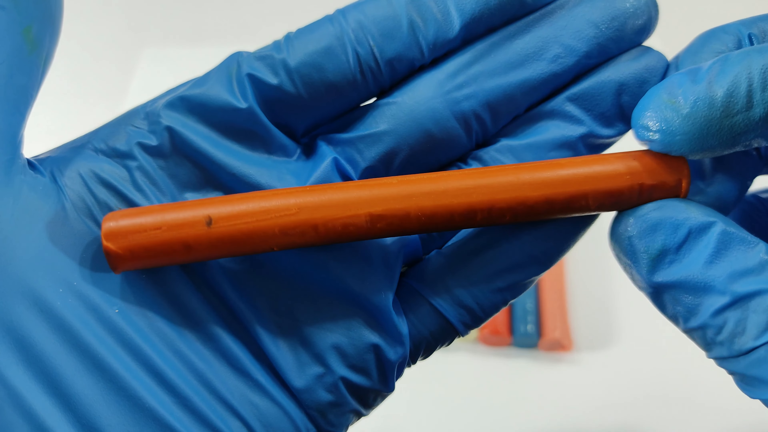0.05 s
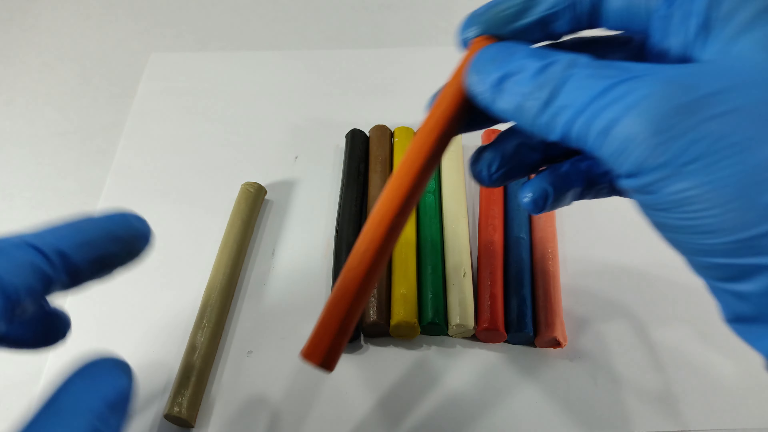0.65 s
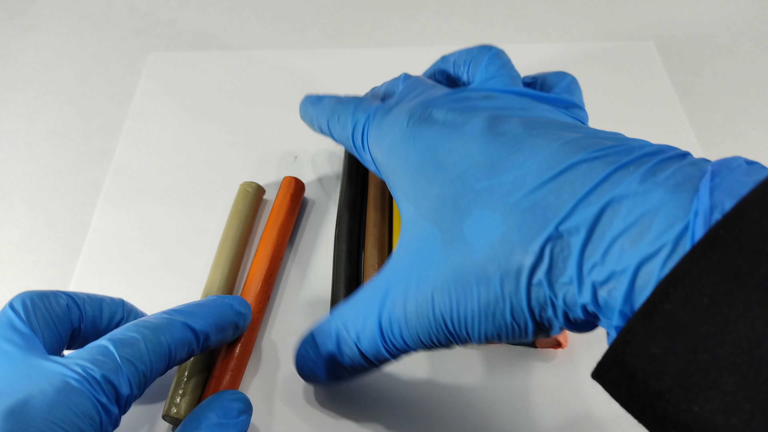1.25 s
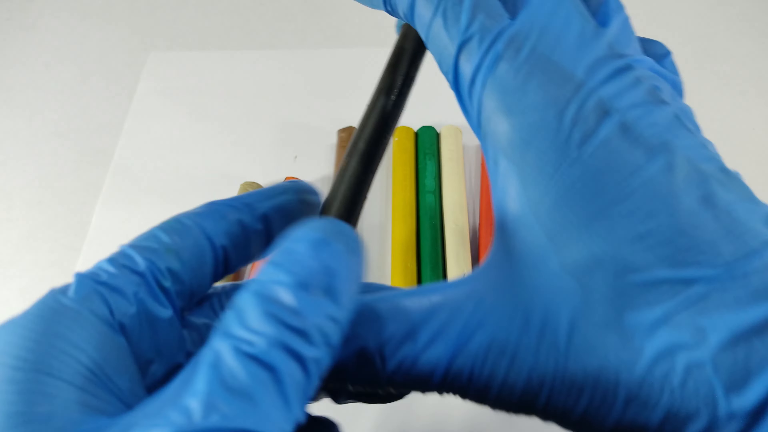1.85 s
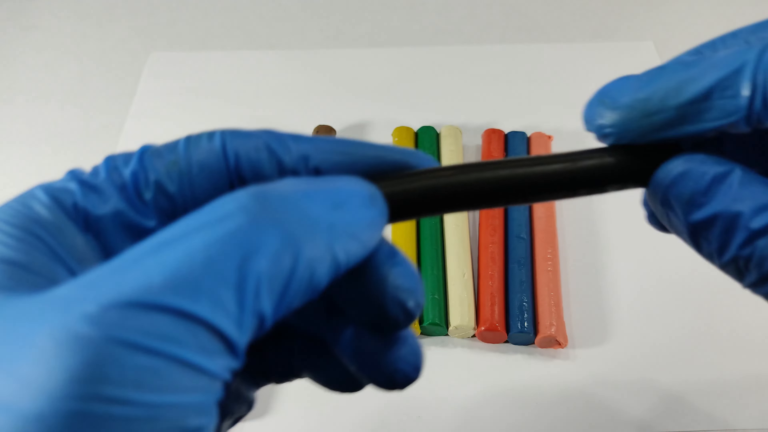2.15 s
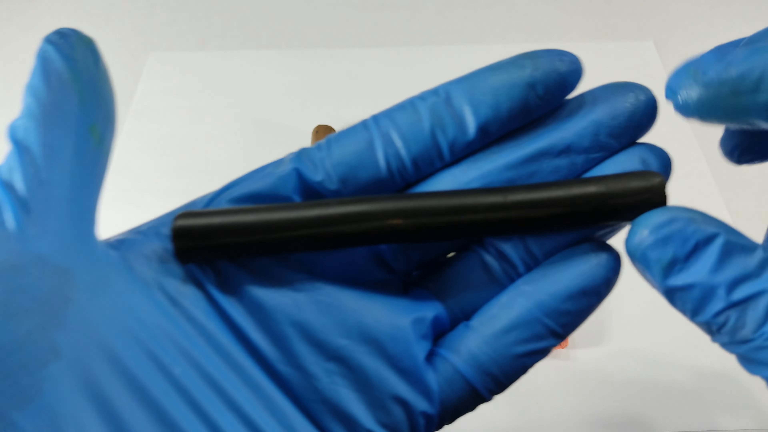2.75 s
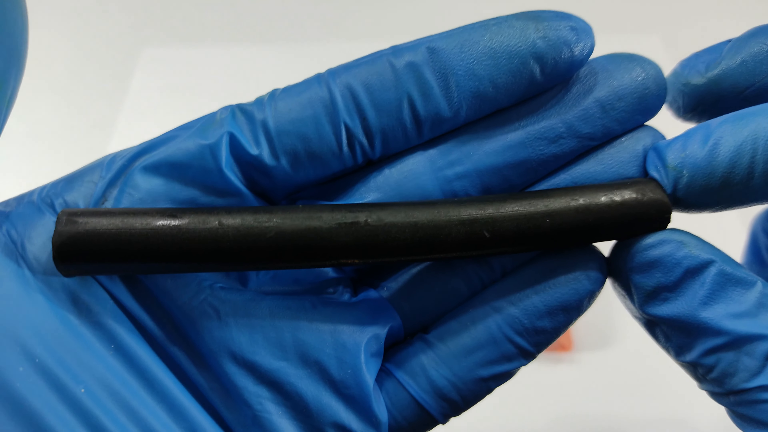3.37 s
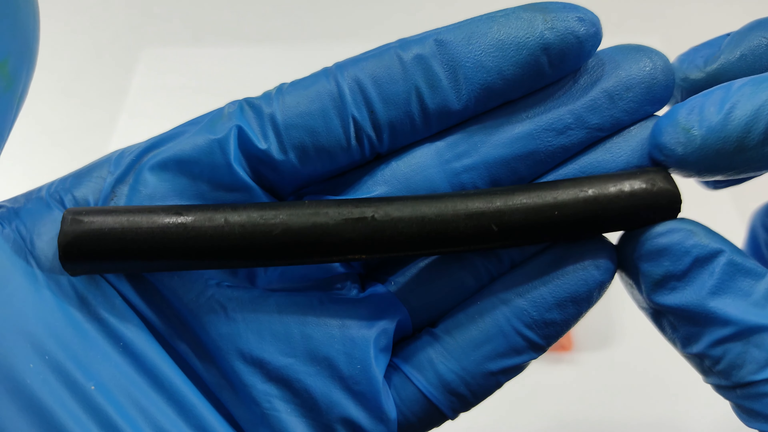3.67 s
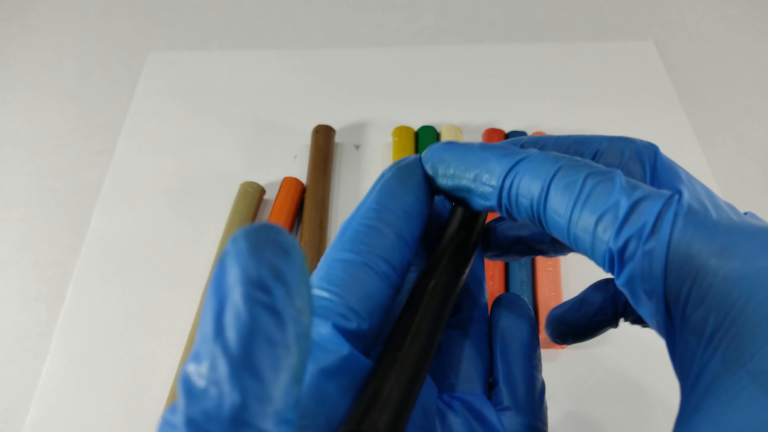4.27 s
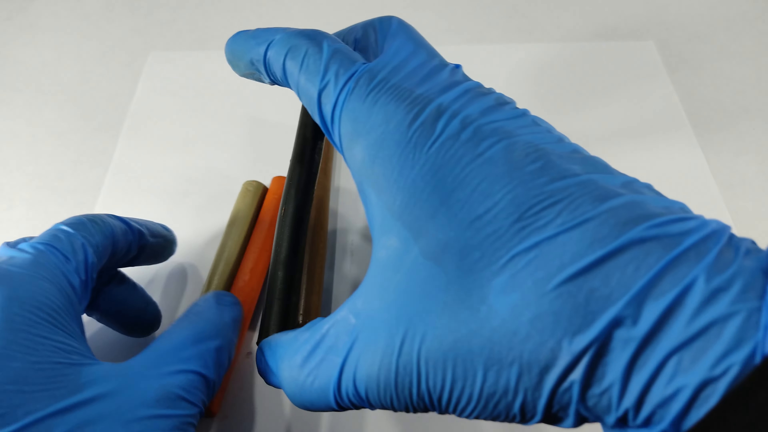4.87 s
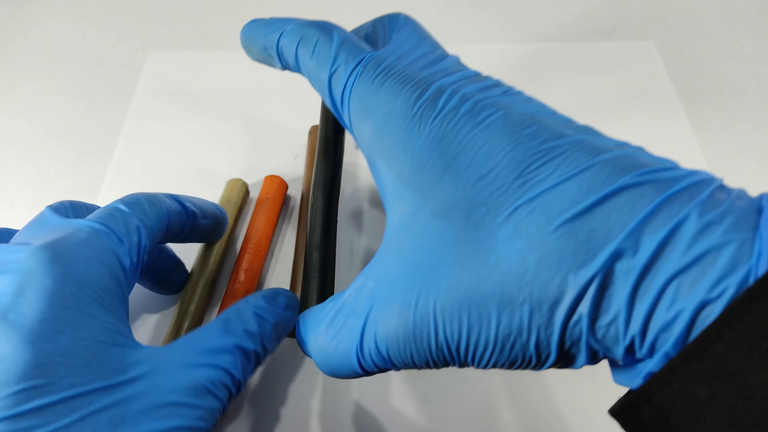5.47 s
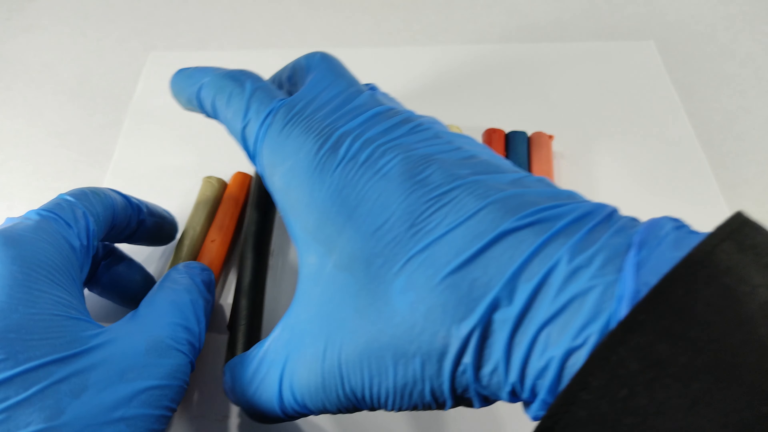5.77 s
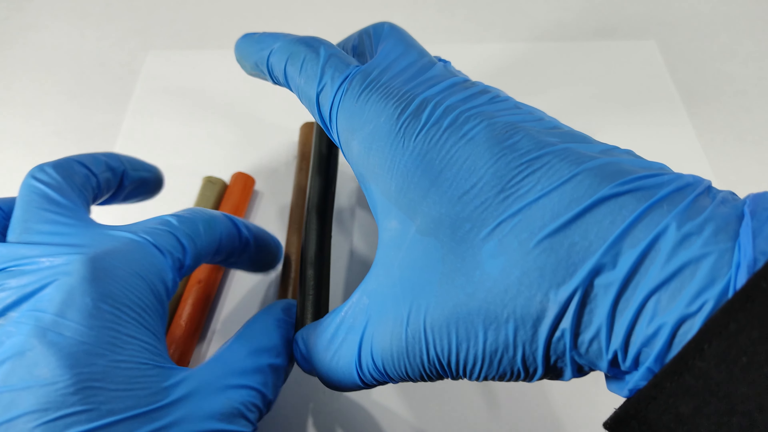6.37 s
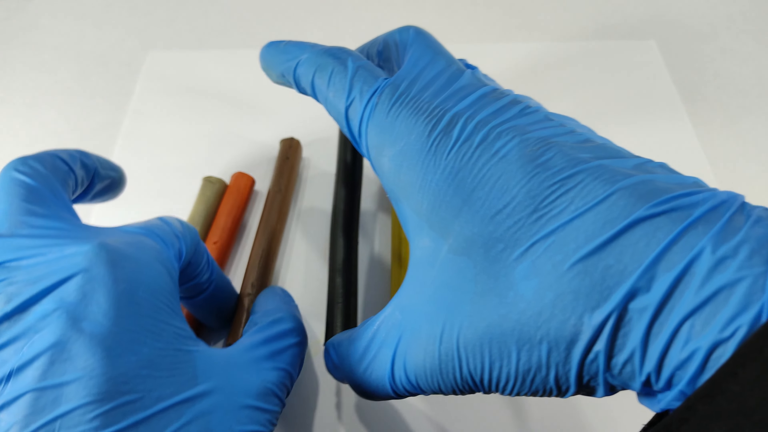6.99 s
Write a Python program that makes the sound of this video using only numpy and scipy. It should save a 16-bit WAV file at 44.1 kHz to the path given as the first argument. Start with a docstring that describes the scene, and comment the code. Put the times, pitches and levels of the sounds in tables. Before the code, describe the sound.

Sticks of modelling clay set down on a paper-covered table with dull knocks, amid faint snaps and rubs of thin rubber gloves.

```python
"""Modelling clay on a table

Gloved hands pick up sticks of modelling clay and set them down on a paper-covered table, close by.
Two sticks drop with dull knocks that slap the paper and ring the table; others are nudged softly.
The thin rubber gloves rub (tiny slips), snap (folds flip) and squeak (stick-slip).
A small quiet room answers each sound."""
import sys
import numpy as np
from scipy import signal
from scipy.fft import rfft, irfft, next_fast_len
from scipy.io import wavfile
from scipy.ndimage import map_coordinates

SR = 44100
rng = np.random.default_rng(int(sys.argv[2]) if len(sys.argv) > 2 else 0)


def unload_wav(signal):
    """Save mono or channel-first audio to the path in sys.argv[1] as 16-bit WAV at rate SR, clipped to [-1, 1]."""
    wavfile.write(
        sys.argv[1],
        SR,
        np.round(np.clip(np.atleast_2d(signal).T, -1, 1) * 32767).astype(np.int16),
    )


N = 310023

# room hum: pitch_hz, level_db
HUM_TONES = [(425.3, -86), (559.9, -85), (904.4, -81)]
# clay drags or rolls on paper: peak_s, level_db, half_length_s, rumble_db
DRAGS = [(1.025, -61.5, .012, -81), (1.222, -51.5, .01, -72), (1.335, -42.5, .028, -46),
         (1.53, -64, .05, -76), (1.872, -39, .006, -56), (2.10, -83.5, .037, -62),
         (5.012, -64.5, .017, -56.5), (5.057, -45.5, .009, -48), (5.118, -49, .008, -56),
         (5.668, -71, .016, -50), (6.087, -57, .016, -49)]
# glove slides on glove or clay: peak_s, level_db (before RUB_TRIM_DB), half_length_s, fold_hz, width_oct
RUBS = [(.387, -56, .034, 6700, 2.5), (.464, -55, 0.019, 6300, 2.5), (.882, -68.5, .025, 4170, 3),
        (1.161, -49.5, .018, 3970, 3.2), (1.345, -56.5, 0.013, 5900, 2), (1.527, -60.5, .04, 1450, 0.92),
        (1.856, -56, .012, 8350, 2.5), (2.02, -55, .022, 8500, 3.1), (2.378, -56.5, .026, 11000, 2.21),
        (2.496, -62, .035, 6555, 2.8), (2.596, -54.5, .022, 4900, 1.1), (2.754, -59, .018, 4730, 0.47),
        (3.99, -57.5, 0.022, 6360, 1.403), (4.285, -63, .012, 6400, 3.4), (4.417, -63, 0.035, 6480, 1.4),
        (4.553, -65, 0.025, 6330, 1.25), (4.709, -60.5, 0.036, 6800, 1.6), (6.715, -67.5, .018, 6020, 1.2),
        (6.956, -72, 0.05, 5040, 1.02)]
# fingers shift their hold: start_s, end_s
REGRIPS = [(.52, .72), (2.1, 2.32), (4.08, 4.6)]
# rubber sticks and slips on clay: peak_s, level_db, half_length_s, pitch_hz
SQUEAKS = [(0.395, -65, 0.045, 3730), (.485, -53, 0.0039, 2450), (.486, -60, 0.0098, 1940),
           (1.47, -59, .019, 2400), (2.39, -68.5, 0.045, 2958), (2.387, -72, 0.031, 1900),
           (2.732, -53.5, 0.0035, 3010), (5.005, -51, 0.0031, 2060), (5.044, -55, 0.0034, 2110),
           (2.589, -66, .013, 2990), (6.837, -68, 0.012, 3550), (6.838, -65, 0.011, 4900),
           (6.96, -72, 0.043, 4050)]
# a glove fold flips: peak_s, level_db, fold_hz, width_oct
SNAPS = [(1.122, -38.5, 6300, 6.6), (1.21, -43, 6400, 2.7), (1.5012, -37.5, 7220, 1.83),
         (1.544, -47.5, 6216, 1.3), (2.040, -45, 13040, 0.97), (2.4755, -45, 5000, 1.03),
         (2.583, -42.5, 4734, 1.7), (2.6283, -53.5, 4510, 1.31), (2.735, -38.5, 5056, 2.2),
         (3.978, -53, 5896, 1.65), (4.005, -44.5, 8540, 1.65), (4.093, -54, 3280, 1.3),
         (4.702, -56, 6280, 0.82), (5.004, -42.5, 8990, 1.37), (5.065, -46, 7130, 1.3),
         (5.118, -43.5, 8400, 0.8), (5.279, -44.5, 6400, 1.4), (5.343, -53, 5320, 1.23),
         (5.659, -58.5, 4060, 1.5), (6.838, -56.5, 5000, 1.7)]
# table modes: pitch_hz, weight_db, t60_s (before capping and shortening for soft knocks)
TABLE_MODES = [(119, 1, 0.39), (176.2, 1, 0.25), (211, 1.5, 0.23), (256, -5.5, 0.71), (355.6, 0, 0.78),
               (424, -8.5, 0.4), (487.2, -2, 0.3), (615.5, -9, 0.29), (713.5, -9, 0.25), (791, -8.5, 0.12),
               (1152, -14.5, 0.72), (1244, -6.5, 0.51), (1503, -16, 0.19), (1600, -18, 0.22),
               (1710, -12, 0.23), (1970, -12.5, 0.63), (2191, -21.5, 0.84), (2180, -18, 0.22),
               (2260, -19.5, 0.14), (2543, -28.5, 0.3), (2700, -22.5, 0.18), (2716, -21.5, 0.18)]
# clay meets table: start_s, force_db, grip (0-1), slap_db (re force, before SLAP_TRIM_DB), spot_hz
# slap_db is high when the stick lands flat
KNOCKS = [(1.0409, -33.5, .3, -12, 337), (1.243, -20.5, 0.012, -3.5, 131), (1.249, -17.5, 0.06, -18, 603),
          (1.271, -27, .22, -15.5, 284), (1.880, -21, .05, 4.5, 399), (1.887, -20.5, .22, -15, 318),
          (5.068, -36.5, .8, -3.5, 338), (5.075, -36, 1, -32, 342), (5.675, -43, .9, -41, 330),
          (6.081, -51, .45, -1, 149.3)]
# noise spectra: freq_hz, density_db
AIR_SPECTRUM = [(12, -25.5), (20, 2.5), (38, -15.5), (98, -20.5), (185, -26.5), (225, -20), (259, -26),
                (416, -22.5), (581, -25.5), (667, -26.5), (906, -30.5), (1040, -31), (2030, -34),
                (5530, -43.5), (15500, -45.5)]
DRAG_SPECTRUM = [(40, -24), (130, -5), (380, 3.5), (650, -12.5), (1400, -11.5), (2500, -27), (6000, -45)]
RUMBLE_SPECTRUM = [(30, -13.5), (55, -5), (85, -8.5), (120, 1), (190, -0.5), (280, -19), (800, -54)]
GLOVE_SPECTRUM = [(300, -35.5), (1400, -8), (2400, -5), (3100, -3), (4200, -5), (5100, -3.5), (5800, -2.5),
                  (6700, -0.5), (7700, -4), (9500, -6), (11500, -6.5), (14000, -7), (16000, -15)]
THUD_SPECTRUM = [(30, -20), (60, -13), (90, -14), (125, -6.5), (180, -1.5), (260, -3.5), (380, 1),
                 (500, -1), (700, -21), (1200, -35.5), (3000, -71.5)]
CLAP_SPECTRUM = [(150, -32), (450, -8), (620, -2.5), (1000, -3.5), (1200, -9.5), (2000, -23), (5000, -48)]
SLAP_SPECTRUM = [(400, -37), (900, -17), (1250, -2.5), (1430, -2), (1580, -2), (1850, -8), (2300, -8.5),
                 (2520, -15.5), (2780, -10), (3300, -20.5), (8000, -47), (16000, -60)]
CRACK_SPECTRUM = [(800, -19.5), (2500, 1.5), (4200, -2), (7000, -6.5), (10000, -14.5), (15500, -16)]

AIR_DB, TOP_HZ = -66.5, 15850
RUBBER_BRIGHT_HZ, RUBBER_PULL = 8300, .17
RUB_TRIM_DB, SLAP_TRIM_DB = -2, 3.5
SETTLE_DB, SETTLE_LAG_S, SETTLE_HALF_S = -15.5, .006, .014  # level re the snap
RUSTLE_DB, RUSTLE_HALF_S, RUSTLE_HZ, RUSTLE_WIDTH_OCT = -79, .042, 6400, 2
RING_DB, THUD_DB, CLAP_DB = -1, .5, 2  # re force, free stick
GRIP_MUTE_DB, SOFT_KNOCK_SHORTENING, MAX_RING_T60_S = 33, .15, .32
FIRM_FORCE_DB, FIRM_CUTOFF_HZ, FORCE_DB_PER_OCT = -21.5, 3300, 18
CRACK_DB, CRACK_DB_PER_DB = -4.9, .8  # re slap_db at firm force; growth with force


def amp(db):
    """Decibels to gain."""
    return 10 ** (np.asarray(db) / 20)


def spectrum(points):
    """Gain curve through (freq_hz, density_db) points on a log axis."""
    freq_hz, density_db = np.transpose(points)
    return lambda hz: amp(np.interp(np.log(hz + 1), np.log(freq_hz), density_db))


def resonance(hz, centre_hz, q):
    """Gain of one resonance."""
    return 1 / np.hypot(1, q * ((hz + 1) / centre_hz - centre_hz / (hz + 1)))


def noise(colour, size):
    """Unit-rms noise shaped by the gain curve colour(hz)."""
    hz = np.fft.rfftfreq(size, 1 / SR)
    x = irfft(colour(hz) * np.exp(2j * np.pi * rng.random(len(hz))), size)
    return x / np.sqrt(np.mean(x ** 2) + 1e-20)


def wobble(rate_hz, size):
    """Smooth random curve."""
    knots = rng.standard_normal(int(size * rate_hz / SR) + 4)
    return map_coordinates(knots, [np.arange(size) * rate_hz / SR])


def burst(colour, envelope):
    """Coloured noise with the energy of its envelope."""
    x = noise(colour, len(envelope)) * envelope
    return x * np.linalg.norm(envelope) / (np.linalg.norm(x) + 1e-20)


def room_burst(colour, envelope, room_db, t60_s):
    """Noise burst plus diffuse echo: the room stores energy and leaks it."""
    retained = np.exp(-np.log(1e6) / (t60_s * SR))
    stored_energy = signal.lfilter([1 - retained], [1, -retained], envelope ** 2)
    return burst(colour, envelope) + amp(room_db) * burst(colour, np.sqrt(stored_energy))


def add(track, start_s, x):
    """Mix x into the track."""
    start = round(start_s * SR)
    x = x[max(-start, 0):max(N - start, 0)]
    track[max(start, 0):][:len(x)] += x


def swell(peak_s, half_s, rough_db=0, grain_hz=1500):
    """Start time and Gaussian envelope of a stroke, optionally grainy."""
    lead_s = 3 * half_s
    t = np.arange(SR // 2) / SR - lead_s
    grain = amp(rough_db * wobble(grain_hz, len(t)))
    return peak_s - lead_s, np.exp(-.5 * (t / half_s) ** 2) * grain


def contact(t, rise_s, hold_s):
    """Impact envelope: quick rise, stopped by the soft clay."""
    return (1 - np.exp(-2 * t / rise_s)) ** 2 * np.exp(-(t / hold_s) ** 2)


def room_tone():
    """Still air with a faint, unsteady hum."""
    t = np.arange(N) / SR
    hum = sum(amp(db) * np.sin(2 * np.pi * hz * t + 1.9 * wobble(34, N)) for hz, db in HUM_TONES)
    air = amp(AIR_DB) * noise(spectrum(AIR_SPECTRUM), next_fast_len(N))[:N]
    return hum + air


def clay_drags():
    """Sliding clay makes the table murmur."""
    out = np.zeros(N)
    for peak_s, level_db, half_s, rumble_db in DRAGS:
        start_s, envelope = swell(peak_s, half_s, rough_db=3.5, grain_hz=260)
        friction = room_burst(spectrum(DRAG_SPECTRUM), envelope, room_db=-4.5, t60_s=.17)
        rumble = room_burst(spectrum(RUMBLE_SPECTRUM), envelope, room_db=-5.5, t60_s=.66)
        add(out, start_s, amp(level_db) * friction + amp(rumble_db) * rumble)
    return out


def rubber_colour(fold_hz, width_oct):
    """Stretched rubber: a band, one main fold resonance, narrow ridges from lesser folds."""
    centre_hz = fold_hz * (RUBBER_BRIGHT_HZ / fold_hz) ** RUBBER_PULL
    low_hz, high_hz = centre_hz / 2 ** (width_oct / 2), centre_hz * 2 ** (width_oct / 2)
    fold_db = 15 - 3.5 * width_oct  # stands out less in a wide band
    ridges = amp(5 * wobble(360, SR // 4 + 1))  # one gain per frequency bin

    def colour(hz):
        band = 1 / np.sqrt((1 + (low_hz / (hz + 1)) ** 12) * (1 + (hz / high_hz) ** 12))
        fold = amp(fold_db) * resonance(hz, fold_hz, q=15) ** 2
        return spectrum(GLOVE_SPECTRUM)(hz) * (band * ridges + fold + amp(-26))
    return colour


def glove_rubs():
    """Dense runs of tiny slips: slides, rubber settling at each snap, faint random rustles."""
    out = np.zeros(N)
    slides = [(peak_s, db + RUB_TRIM_DB, *rest) for peak_s, db, *rest in RUBS]
    settles = [(peak_s + SETTLE_LAG_S, db + SETTLE_DB, SETTLE_HALF_S, fold_hz, width_oct)
               for peak_s, db, fold_hz, width_oct in SNAPS]
    rustles = [(start_s + (end_s - start_s) * when, RUSTLE_DB, RUSTLE_HALF_S,
                RUSTLE_HZ * 2 ** (pitch - .5), RUSTLE_WIDTH_OCT)
               for start_s, end_s in REGRIPS for when, pitch in rng.random((4, 2))]
    for peak_s, level_db, half_s, fold_hz, width_oct in slides + settles + rustles:
        start_s, envelope = swell(peak_s, half_s, rough_db=3, grain_hz=350)
        rub = room_burst(rubber_colour(fold_hz, width_oct), envelope, room_db=-3, t60_s=.32)
        add(out, start_s, amp(level_db) * rub)
    return out


def glove_squeaks():
    """Short slips ring one narrow resonance of the stretched rubber."""
    out = np.zeros(N)
    for peak_s, level_db, half_s, pitch_hz in SQUEAKS:
        start_s, envelope = swell(peak_s, half_s, rough_db=-2, grain_hz=243)
        colour = lambda hz: resonance(hz, pitch_hz, q=18) ** 2
        add(out, start_s, amp(level_db) * room_burst(colour, envelope, room_db=-5.5, t60_s=.22))
    return out


def glove_snaps():
    """A flipping fold crackles for a few ms around its own pitch."""
    out = np.zeros(N)
    for peak_s, level_db, fold_hz, width_oct in SNAPS:
        start_s, envelope = swell(peak_s, half_s=.0018)
        snap = room_burst(rubber_colour(fold_hz, width_oct), envelope, room_db=-4, t60_s=.082)
        add(out, start_s, amp(level_db) * snap)
    return out


def table_ring(t, spot_gain, decay_scale):
    """The heavy top swings up in a few ms, then rings briefly."""
    mode_hz, weight_db, t60_s = np.transpose(TABLE_MODES)[:, :, None]
    ring_t60_s = np.minimum(t60_s, MAX_RING_T60_S) * decay_scale
    weights = amp(weight_db) * spot_gain(mode_hz)
    modes = np.sin(2 * np.pi * (mode_hz * t + rng.random(mode_hz.shape))) * amp(-60 * t / ring_t60_s)
    swing_up = 1 - np.exp(-t / .004)
    return (weights * modes).sum(0) / np.linalg.norm(weights) * swing_up


def clay_knocks():
    """A stick slaps the paper, then the table thuds and rings; a held stick claps less."""
    out, t = np.zeros(N), np.arange(SR * 3 // 4) / SR
    for start_s, force_db, grip, slap_db, spot_hz in KNOCKS:
        decay_scale = 1 - SOFT_KNOCK_SHORTENING * grip ** 2  # soft nudges die away sooner
        excess_db = force_db - FIRM_FORCE_DB
        cutoff_hz = FIRM_CUTOFF_HZ * 2 ** (excess_db / FORCE_DB_PER_OCT)  # gentler is duller
        spread = .22 * (1 - .64 * grip)  # a free stick lands full length and wakes all modes
        spot_gain = lambda hz: resonance(hz, spot_hz, q=2.5) + spread  # each spot favours its own modes
        thud_colour = lambda hz: spectrum(THUD_SPECTRUM)(hz) * np.sqrt(spot_gain(hz))
        slap_colour = lambda hz: spectrum(SLAP_SPECTRUM)(hz) / np.hypot(1, (hz / cutoff_hz) ** 4)

        ring = table_ring(t, spot_gain, decay_scale)
        thud = room_burst(thud_colour, contact(t, rise_s=.0064, hold_s=.02),
                          room_db=-1.5, t60_s=.2 * decay_scale)
        clap = room_burst(spectrum(CLAP_SPECTRUM), contact(t, rise_s=.0015, hold_s=.014),
                          room_db=-2.5, t60_s=.3 * decay_scale)
        slap = room_burst(slap_colour, contact(t, rise_s=.0005, hold_s=.0069),
                          room_db=-3.5, t60_s=.26 * decay_scale)
        crack = room_burst(spectrum(CRACK_SPECTRUM), contact(t, rise_s=.00026, hold_s=.0049),
                           room_db=1, t60_s=.23 * decay_scale)

        clap_db = CLAP_DB - GRIP_MUTE_DB * grip
        crack_db = slap_db + CRACK_DB + CRACK_DB_PER_DB * excess_db
        gains = amp(force_db) * amp([RING_DB, THUD_DB, clap_db, slap_db + SLAP_TRIM_DB, crack_db])
        add(out, start_s, gains @ np.array([ring, thud, clap, slap, crack]))
    return out


def scene():
    """Mono mix."""
    clay = clay_knocks() + clay_drags()
    gloves = glove_rubs() + glove_snaps() + glove_squeaks()
    return (clay + gloves + room_tone())[None]


def record(dry):
    """Brick-wall low-pass at TOP_HZ."""
    size = next_fast_len(N + SR // 2)
    passband = np.fft.rfftfreq(size, 1 / SR) < TOP_HZ
    return irfft(rfft(dry, size) * passband, size)[..., :N]


dry = scene()
out = record(dry)
unload_wav(out)
```